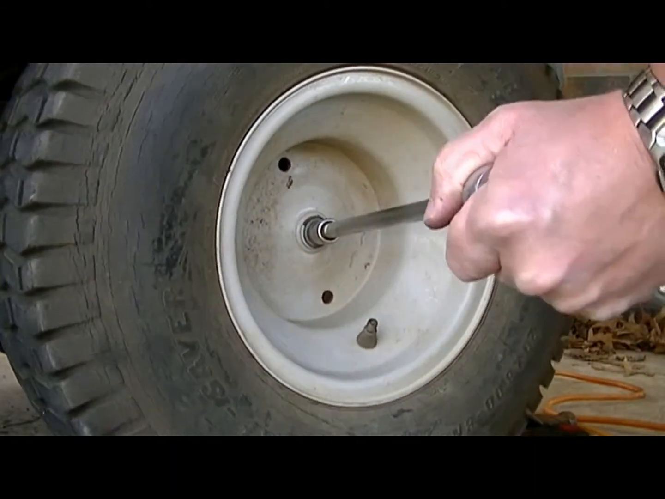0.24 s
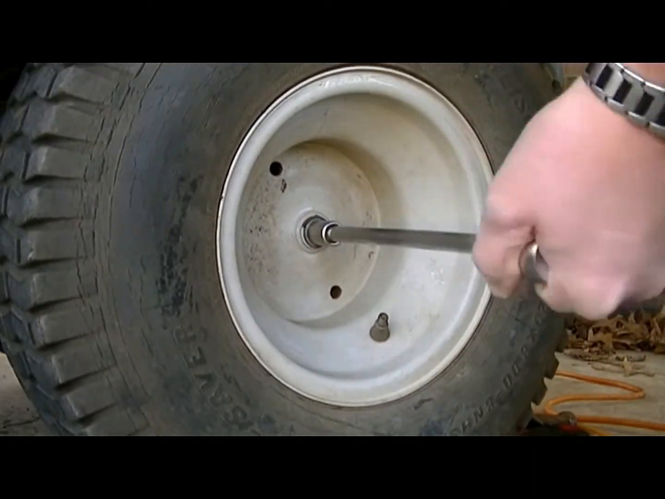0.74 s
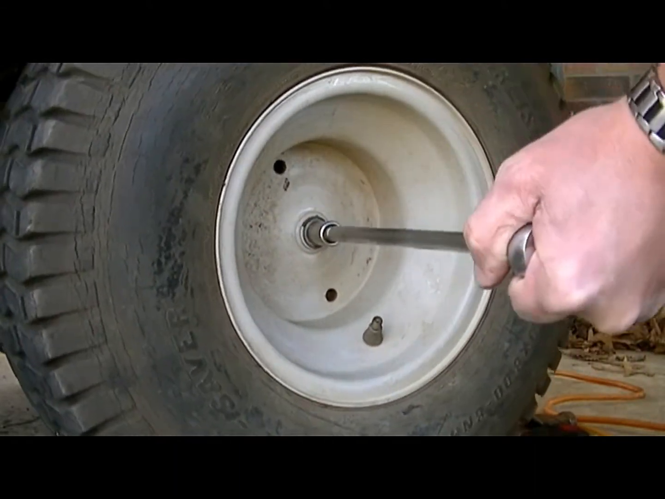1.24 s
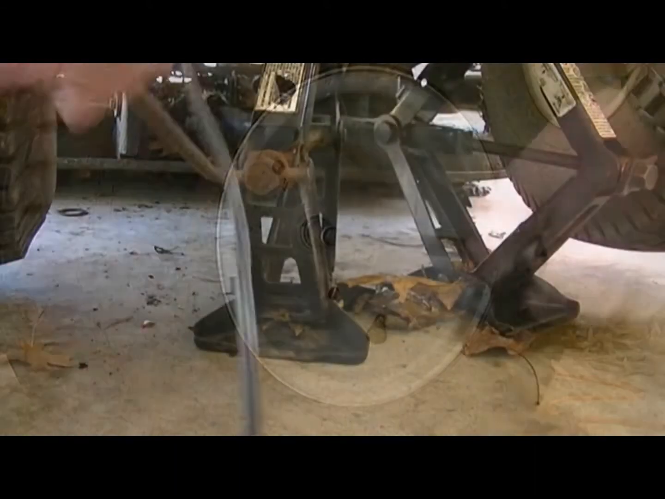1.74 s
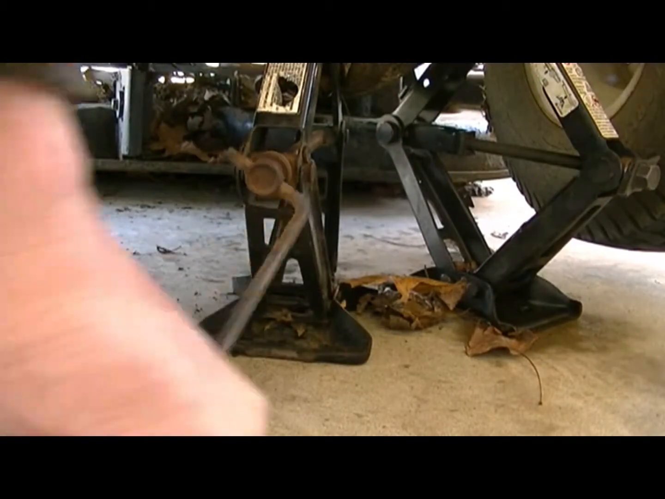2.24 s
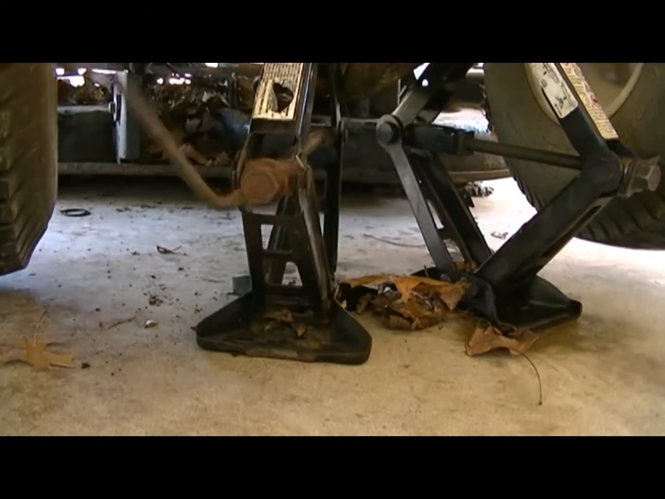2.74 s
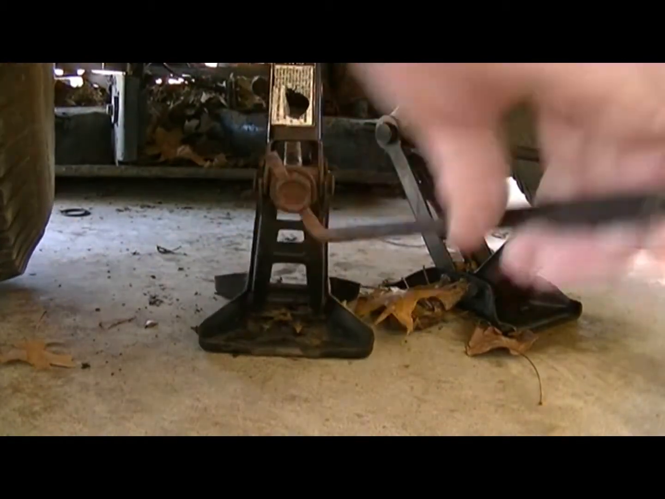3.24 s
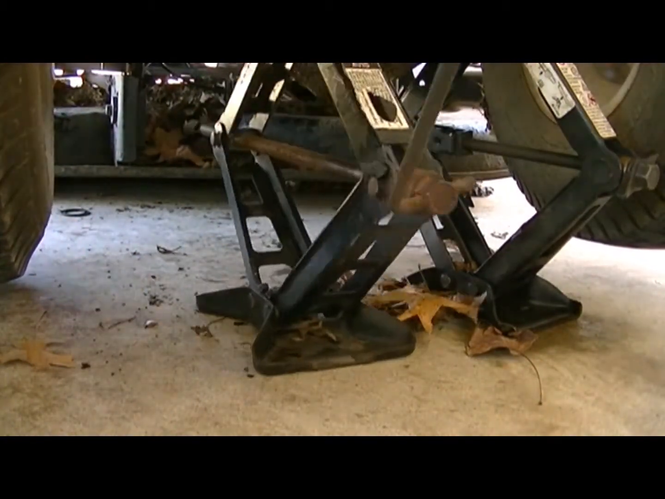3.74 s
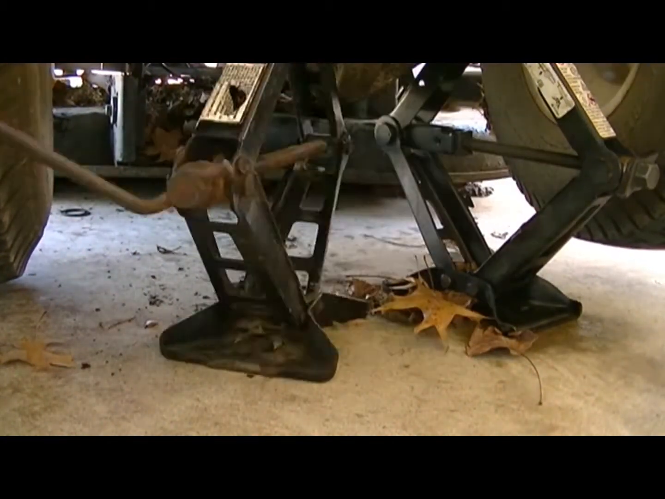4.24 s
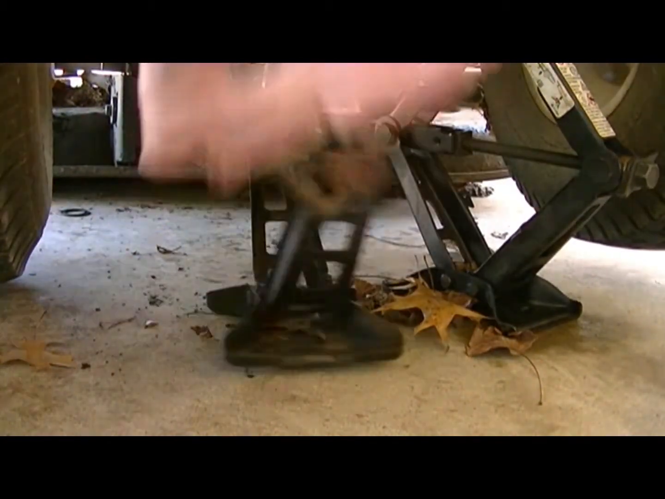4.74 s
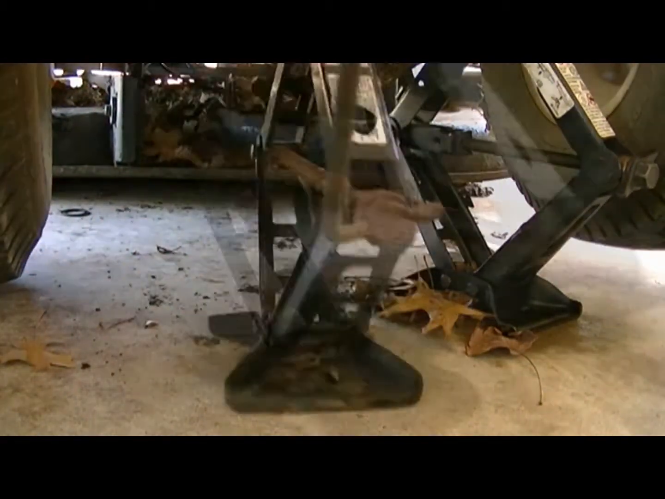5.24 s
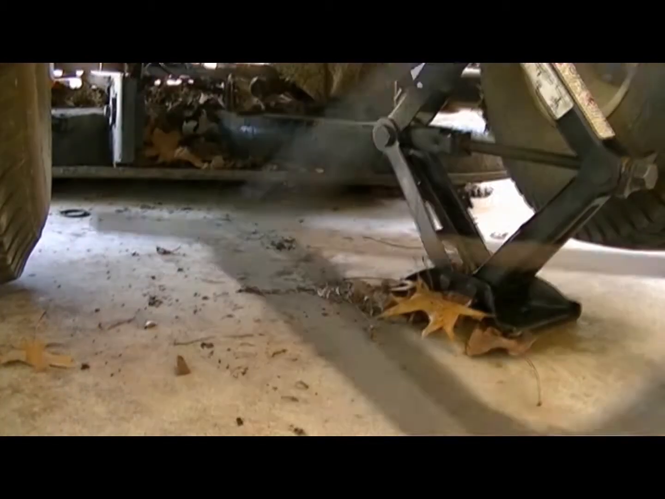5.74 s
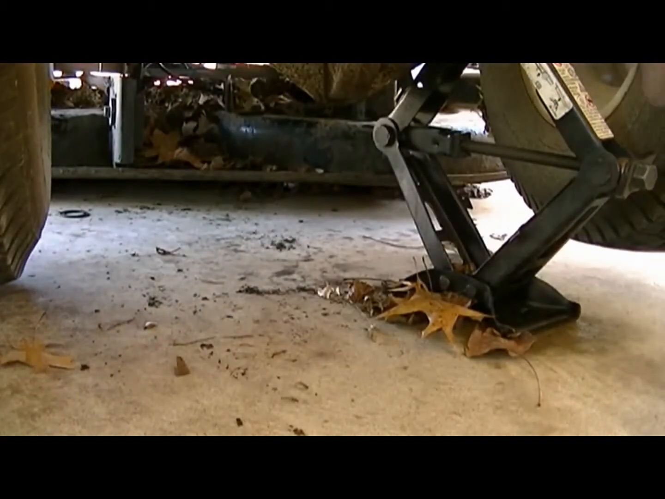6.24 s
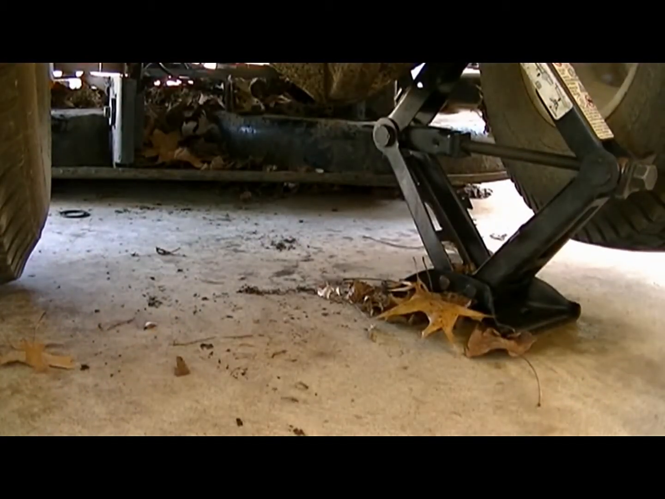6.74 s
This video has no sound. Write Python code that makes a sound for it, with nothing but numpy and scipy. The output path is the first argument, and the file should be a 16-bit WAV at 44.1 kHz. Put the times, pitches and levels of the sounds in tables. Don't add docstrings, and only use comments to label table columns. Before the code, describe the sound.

A close microphone in a garage with a short, dull reverberation; a motor drones low and faint far away throughout. At 0.25-0.4 s a wrench on a tight wheel nut gives a cluster of bright ticks and a creak, then only tiny clicks. A blink of silence falls at 1.6 s, followed by a small squeak and gritty snaps until 1.9. After a lull, a very loud, high, dry screw squeak jumps out at 2.63, then a harsher stuttering run at 2.8-2.95. From 3.45 the loose steel frame wobbles with scratchy rubs, clicks and dull floor knocks, notably at 3.65, 4.16 and, hardest, 4.95; small squeaks mix in. A raspy drag rushes across concrete at 5.65-5.95. At 6.0 the jack falls in a harsh, ringing clatter, bouncing until 6.3, overloading the microphone; light tinkling bounces follow near 6.45, then faint drone and airy bustle.

```python
import sys
import numpy as np
from scipy import signal
from scipy.fft import rfft, irfft
from scipy.io import wavfile

SR = 44100
rng = np.random.default_rng(int(sys.argv[2]) if len(sys.argv) > 2 else 0)


def store_pcm(level_fs):
    pcm = np.round(np.clip(level_fs, -1, 1) * 32767).astype(np.int16)
    wavfile.write(sys.argv[1], SR, np.atleast_2d(pcm).T)


def amplitude_ratio(level_db):
    exponent = np.asarray(level_db, float) / 20
    return 10 ** exponent


N = 308429


def band(x, low_hz, high_hz, order=2):
    return signal.sosfilt(signal.butter(order, [low_hz, high_hz], "band", fs=SR, output="sos"), x)


def rms_one(x):
    return x / np.sqrt(np.mean(x ** 2) + 1e-20)


def at_hz(points, hz):
    curve_hz, curve_db = np.transpose(points)
    return np.interp(np.log(hz), np.log(curve_hz), curve_db)


def drift(rate, size=N):
    step_rate = 2000
    points = rng.standard_normal(int(size / SR * step_rate) + 500)
    r = np.exp(-2 * np.pi * rate / step_rate)
    slow = signal.lfilter([1], [1, -2 * r, r * r], points)[498:]
    slow = slow * 2 * (1 - r) ** 1.5
    return np.interp(np.arange(size) / SR * step_rate, np.arange(len(slow)), slow)


def ring(x, hz, t60):
    r = amplitude_ratio(-60 / (t60 * SR))
    w = 2 * np.pi * hz / SR
    return signal.lfilter([0, np.sin(w)], [1, -2 * r * np.cos(w), r * r], x + 1e-18)


def swell(s, rise_ms, fall_ms, shape):
    first = max(0, int((s - .008 * rise_ms) * SR))
    last = min(N, int((s + .01 * fall_ms) * SR))
    at = np.arange(first, last)
    ms = (at / SR - s) * 1000
    side_ms = np.where(ms < 0, max(rise_ms, .3), max(fall_ms, .3))
    return at, 2.0 ** -np.abs(ms / side_ms) ** shape


def coloured(spectrum):
    hz = np.maximum(np.arange(N // 2 + 1) * SR / N, 1)
    inside = (hz > spectrum[0][0] / 2) & (hz < spectrum[-1][0] * 2)
    return rms_one(irfft(rfft(rng.standard_normal(N)) * amplitude_ratio(at_hz(spectrum, hz)) * inside, N))


# pitch in Hz, level in dB per Hz.
RUMBLE_TONE = [(20, -47.5), (45, -19.5), (65, -11), (90, -4.5), (130, -4.5), (270, -4.5), (750, -10),
               (1300, -13), (2500, -21.5), (5000, -44)]
# pitch in Hz, level in dB per Hz.
HISS_TONE = [(900, 5), (1600, -2.5), (3500, 1.5), (8000, -4), (12000, -12.5), (16000, -19)]
# multiple of the lowest pitch, level in dB.
DRONE_LINES = [(1, 1), (1.497, -11), (2, -12.5), (3, -16.5), (4, -9.5), (5.001, -13), (7.25, -35)]
# time in seconds, level in dB.
BUSTLE_LEVEL = [(0.0, -56), (1.57, -57.5), (1.61, -47.5), (2.05, -54.5), (4.1, -49.5), (6.5, -46),
                (6.99, -46.5)]
# time in seconds, level in dB.
MOTOR_LEVEL = [(0.0, -56), (0.52, -55.5), (1.57, -57), (1.61, -53), (2.05, -46), (2.6, -52), (4.09, -53),
               (5.5, -50), (6.499, -50.5), (6.99, -49)]
# time in seconds, level in dB.
HUM_LEVEL = [(0.0, 2), (0.45, 4), (1.57, 4.5), (2.0, -8), (3.2, 9.5), (3.6, -3.5), (6.3, -6), (6.7, -6)]


def background():
    t = np.arange(N) / SR
    rumble_db, motor_db, hum_db = [np.interp(t, *np.transpose(curve))
                                   for curve in (BUSTLE_LEVEL, MOTOR_LEVEL, HUM_LEVEL)]
    drone_hz = 90.2 * (1 + 0.006 * drift(3))
    phase = 2 * np.pi * np.cumsum(drone_hz) / SR
    multiple, lowest_db = DRONE_LINES[0]
    lowest = amplitude_ratio(lowest_db + drift(25)) * np.sin(multiple * phase)
    throb = 0.23 * rms_one(band(rng.standard_normal(N), 73, 110))
    hum = sum(amplitude_ratio(level_db - 55 + drift(1.7)) * np.sin(k * phase) for k, level_db in DRONE_LINES[1:])
    rumble = amplitude_ratio(rumble_db + 1.2 * drift(6)) * coloured(RUMBLE_TONE)
    hiss_db = -63.5 + 0.38 * (rumble_db + 50.5)
    hiss = amplitude_ratio(hiss_db + 1.4 * drift(9)) * coloured(HISS_TONE)
    return rumble + hiss + amplitude_ratio(motor_db + 1) * (lowest + throb) + amplitude_ratio(hum_db) * hum


def blows(table, cycles, linger, crack_db, crack_per_ring, low_hz, high_hz, boom_db):
    out, t = np.zeros(N + SR), np.arange(SR // 4) / SR
    for s, peak_db, hz in table:
        t60 = (cycles - linger * peak_db) / hz
        puff = rng.standard_normal(len(t)) * amplitude_ratio(crack_db - 60 * t / (crack_per_ring * t60))
        puff = band(puff, low_hz, high_hz)
        tone = np.sin(2 * np.pi * hz * t) * amplitude_ratio(-60 * t / t60)
        tone += np.sin(2 * np.pi * 0.81 * hz * t) * amplitude_ratio(boom_db - 28 * t / t60)
        start = int(s * SR)
        out[start:start + len(t)] += amplitude_ratio(peak_db) * (tone * np.minimum(t * hz, 1) + puff)
    return out[:N]


def sharp_blows(table, cycles):
    return 0.49 * blows(table, cycles, 0, crack_db=-2.5, crack_per_ring=1.0, low_hz=2234, high_hz=6840, boom_db=-38)


# start in seconds, peak level in dB, ring pitch in Hz.
PLAY_TICKS = [(0.2403, -26.5, 2630), (0.3226, -19, 4140), (0.3443, -12.5, 5100), (0.3606, -24, 4000),
              (0.5312, -40, 3040), (0.7512, -36.5, 2310), (0.8515, -44, 2210), (1.366, -33, 2600),
              (1.392, -39, 2520), (1.4577, -37.5, 2700), (1.5494, -33, 2620), (1.7085, -25, 4700),
              (1.709, -26, 2000), (3.7411, -7.5, 5600), (3.7978, -28, 2530), (3.8205, -17, 2420),
              (4.3464, -27, 2430), (4.4882, -25, 2240), (4.574, -29.5, 2480), (5.1821, -18.5, 2160),
              (5.215, -15.5, 2480), (5.622, -17, 7480)]


def play_ticks():
    return sharp_blows(PLAY_TICKS, cycles=35)


# start in seconds, peak level in dB, pitch in Hz.
FLOOR_KNOCKS = [(0.287, -21, 377), (0.302, -22.5, 510), (0.344, -21.5, 396), (0.363, -28, 377),
                (0.455, -36, 370), (0.671, -31, 404), (0.748, -30, 353), (1.64, -32, 332),
                (1.683, -28, 580), (2.067, -34, 600), (3.015, -25, 196), (3.016, -20.5, 411),
                (3.645, -12.5, 310), (3.667, -29, 228), (4.157, -12, 316), (4.199, -27, 370),
                (4.224, -23.5, 220), (4.401, -40, 245), (4.518, -26, 255), (4.53, -37, 576),
                (4.713, -19, 332), (4.739, -21.5, 306), (4.9505, -17, 370), (4.952, -5, 297),
                (4.978, -19, 224), (5.524, -13, 317), (5.558, -33, 241), (3.055, -34, 378),
                (5.777, -13.5, 508), (5.779, -38, 254)]


def floor_knocks():
    return 0.51 * blows(FLOOR_KNOCKS, cycles=9.9, linger=0.35, crack_db=4, crack_per_ring=1.18,
                        low_hz=186, high_hz=1380, boom_db=-10.5)


# start in seconds, peak level in dB, ring pitch in Hz.
GRIT_SNAPS = [(0.2885, -33, 4300), (0.3225, -15, 6000), (0.3363, -13.5, 8500), (0.337, -15, 2750),
              (1.7908, -30, 7000), (1.8318, -11.5, 7600), (1.84, -25, 9000), (1.848, -18, 2300),
              (1.8715, -46, 8490), (3.763, -27, 2700), (4.6164, -26.5, 2880), (4.6798, -23.5, 3480),
              (5.5657, -28, 5520)]


def grit_snaps():
    return sharp_blows(GRIT_SNAPS, cycles=15)


def steel(force, treble, body, modes, per_s, spread_db, ring_db, dense_db):
    caught = rng.random((3, N)) < per_s / SR
    strength = amplitude_ratio(spread_db * np.minimum(rng.exponential(1, (3, N)), 5))
    catches = rms_one(caught * strength * rng.choice([-1, 1], (3, N)))
    middle, high, low = catches * [force, treble, body]
    out = 2.28 * band(middle, 1590, 4840) + 1.34 * band(high, 4500, 9040) + 0.98 * band(low, 490, 1474)
    direct = out * amplitude_ratio(dense_db)
    t = np.arange(2000) / SR
    for thicket in rng.standard_normal((5, len(t))) * amplitude_ratio(-60 * t / 0.0078):
        thicket = thicket / np.linalg.norm(thicket)
        out += signal.oaconvolve(direct * .25 * drift(14), thicket)[:N]
    for k, (hz, width, level_db) in enumerate(modes):
        push = treble if hz > 4500 else force
        mode_db = ring_db + level_db + 4 * drift(12)
        drive = np.roll(catches[2], 999 * (k + 1)) * push * amplitude_ratio(mode_db)
        out += (-1) ** k * ring(drive, hz, 2.2 / width) * np.sqrt(width / SR)
    return out


# pitch in Hz, width in Hz, level in dB.
STANDING_MODES = [(2320, 100, 2), (2480, 215, 6), (2000, 650, -12.5), (4040, 80, -20), (5020, 230, -8),
                  (5400, 41, -3.5), (5180, 360, 4.5), (8000, 45, -4), (8640, 42, -2.5)]
# peak time in seconds, level in dB, length in ms, treble in dB.
CREAK_RUBS = [(0.333, -35.5, 23, -6), (0.364, -55, 44, 3), (0.5, -60.5, 43, 3), (1.645, -36.5, 18, -40),
              (1.687, -34.5, 10, -30), (1.709, -44, 2.1, -32), (1.792, -45, 4.1, -14), (1.824, -42, 13, 5),
              (1.852, -31.5, 4.8, -23), (1.97, -58.5, 72, 3), (2.305, -58, 15, -9), (2.39, -61, 25, 5),
              (2.5, -52.5, 12, 0), (2.6, -55.5, 640, -1), (2.85, -28, 12, -1.5), (2.9, -29, 16, -16),
              (2.968, -45, 21, -9), (3.02, -44, 11, -9), (3.132, -49, 11, -6), (3.178, -43, 28, -0.5),
              (3.372, -54, 24, 3)]
# peak time in seconds, level in dB, length in ms, treble in dB.
WOBBLE_RUBS = [(3.458, -54.5, 22, 4), (3.512, -34, 27, -14), (3.542, -33, 20.5, -6),
               (3.618, -41.5, 24, -20), (3.647, -25, 13.5, -27), (3.729, -44.5, 17, -1),
               (3.745, -32.5, 4.5, 4.5), (3.765, -47, 6.2, -17), (3.836, -38, 33, -11), (3.9, -41, 14, 6.5),
               (3.951, -39.5, 18, -14), (3.976, -36.5, 12.4, 6), (4.002, -35, 23, 2),
               (4.066, -38, 9.3, -40), (4.103, -47, 16, -2), (4.138, -32.5, 28, -2), (4.159, -32, 21, -7),
               (4.199, -28.5, 20, -1), (4.225, -34, 9.9, -23), (4.36, -55, 8.6, -18), (4.417, -38, 23, -37),
               (4.475, -45, 5.4, 0), (4.491, -41, 4.7, 0), (4.525, -44, 17, -6), (4.621, -49.5, 35, -25)]
# peak time in seconds, level in dB, length in ms, treble in dB.
CATCH_RUBS = [
    (3.481, -39.5, 15, -1),
    (3.498, -37, 11, -1),
    (3.606, -50, 14, -7),
    (3.798, -44, 8, -6),
    (3.822, -33.5, 11, -4),
    (4.097, -47, 8, 1),
    (5.214, -37.5, 9.3, -1),
    (5.867, -38, 15.5, -9),
]
# peak time in seconds, level in dB, length in ms, treble in dB.
SHUFFLE_RUBS = [(4.679, -39.5, 19, -23), (4.71, -25.5, 16.4, -10), (4.742, -29.5, 3.8, -28),
                (4.822, -35.5, 14, 5.5), (4.915, -61, 11, -13), (4.945, -32.5, 11, -33),
                (4.954, -19.5, 9.9, -10), (4.98, -38, 63, -11), (5.067, -33.5, 20, -40),
                (5.122, -36, 17, -1), (5.185, -38, 24, -6), (5.226, -37, 18, 3), (5.258, -36.5, 38, -40),
                (5.329, -32, 15, -9), (5.362, -33, 10.6, -26), (5.384, -40.5, 10, -8), (5.416, -49, 11, -9),
                (5.474, -36, 18.4, -1.5), (5.523, -27.5, 7, -9.5), (5.568, -59, 7.2, 6),
                (5.625, -35, 17.3, 3)]
# time in seconds, pressure in dB.
DRAG_PRESSURE = [
    (5.64, -44),
    (5.667, -33),
    (5.681, -25.5),
    (5.758, -25),
    (5.815, -22.5),
    (5.855, -32),
    (5.872, -30.5),
    (5.924, -35),
    (5.985, -59.5),
]
# peak time in seconds, level in dB, length in ms, treble in dB.
DRAG_JOLTS = [
    (5.666, -28, 5, -12),
    (5.69, -20.5, 17, -6.5),
    (5.72, -16, 13, -8.5),
    (5.742, -19, 12, -8),
    (5.764, -17.5, 16, 1.5),
    (5.784, -14, 7, 3),
    (5.803, -17.5, 11, 1.5),
    (5.813, -23, 8, -10),
    (5.9, -36.5, 11, -9),
    (5.923, -41.5, 5.4, -5),
]


def rubs():
    force, t = np.zeros((3, N)), np.arange(N) / SR
    # its table, low ring of its parts (dB), share of the length before the peak
    for table, body_db, rise in ((CREAK_RUBS, -4, 0.44), (WOBBLE_RUBS, -0.5, 0.44), (SHUFFLE_RUBS, 1.5, 0.44),
                                 (DRAG_JOLTS, -2.5, 0.44), (CATCH_RUBS, -2.5, 0.16)):
        for s, level_db, length_ms, treble_db in table:
            at, gain = swell(s, rise * length_ms, (1 - rise) * length_ms, shape=1.3)
            fullness_db = body_db - 0.8 * (level_db + 32.5)
            force[:, at] += gain * amplitude_ratio(level_db + np.array([[0], [treble_db], [fullness_db]]))

    s, pressure_db = np.transpose(DRAG_PRESSURE)
    drag_db = np.interp(t, s, pressure_db, left=-120, right=-120)
    treble_db = 1 + 2.5 * (drag_db - pressure_db.max())
    body_db = -6.5 + 27.5 * np.clip(t - s[0], 0, s[-1] - s[0])
    force += amplitude_ratio(drag_db + 3.5 + np.array([0 * t, treble_db, body_db]))

    flutter_db = np.where(t < s[0], 1.6, 0.84) * drift(90)
    ring_db = np.select([t < WOBBLE_RUBS[0][0] - .05, t < s[0]], [-10.5, -1.5], -14)
    return 0.63 * steel(*force * amplitude_ratio(flutter_db), STANDING_MODES, per_s=19000, spread_db=2.1,
                        ring_db=ring_db, dense_db=3)


# peak time in seconds, pitch in Hz, level in dB, length in ms, width in Hz.
GLINT_TONES = [(3.511, 2230, -37, 25, 300), (3.541, 5600, -48, 19, 300), (3.615, 5470, -56, 18, 250),
               (3.648, 2190, -29.5, 12.2, 300), (3.83, 2410, -38, 18, 200), (4.0, 1740, -40, 16, 100),
               (4.157, 2700, -41, 9.2, 400), (4.2, 4900, -30, 12, 250), (4.2, 2460, -28.5, 14, 150),
               (4.35, 4580, -46, 15, 150), (4.372, 4570, -48, 9.8, 100), (4.416, 5350, -50, 24, 200),
               (4.435, 2620, -43.5, 20, 400), (4.497, 8650, -51, 12, 80), (4.525, 1240, -36, 16.3, 500),
               (4.595, 5300, -56, 12, 200), (4.713, 5820, -38, 13, 120), (4.711, 8300, -33.5, 15.6, 400),
               (4.955, 2200, -26, 6, 500), (5.064, 2530, -31, 22, 250), (5.07, 5250, -34, 14, 300),
               (5.06, 4100, -42, 23, 120), (5.126, 2630, -37.5, 18, 250), (5.123, 4840, -36, 11, 400),
               (5.224, 5100, -31.5, 22, 400), (5.235, 2580, -30, 28, 200), (5.259, 4260, -40, 18, 300),
               (5.327, 4670, -32.5, 16.7, 400), (5.328, 6700, -36.5, 16.6, 300),
               (5.385, 4930, -42, 16, 150), (5.475, 6100, -43, 16, 150), (5.719, 2280, -33, 31.4, 400),
               (5.762, 7950, -22, 13, 250), (5.789, 2940, -21, 33, 150), (5.812, 1600, -22.5, 17, 396),
               (5.88, 6500, -42, 30, 202), (1.683, 5670, -34.5, 12.4, 200), (1.853, 2360, -41, 9.5, 300),
               (1.853, 606, -40, 8, 300), (2.939, 2700, -51, 30, 60), (3.898, 6810, -33.5, 15, 60),
               (4.13, 8950, -41, 14, 150), (3.902, 8200, -48, 18, 80)]


def glints():
    out = np.zeros(N)
    for s, hz, level_db, length_ms, width in GLINT_TONES:
        at, gain = swell(s, 0.44 * length_ms, 0.56 * length_ms, shape=1.46)
        tone = ring(rng.standard_normal(len(at)), hz, 2.2 / width)
        out[at] += amplitude_ratio(level_db) * gain * rms_one(tone)
    return out


# peak time in seconds, pitch in Hz, level in dB,
# length in ms, overtone loss in dB at the first octave.
SCREW_SQUEAKS = [(1.732, 1606, -20.5, 19, 15.5), (2.631, 1848, -2, 19, 25), (2.62, 3580, -21, 10.2, 14),
                 (2.665, 1840, -30, 20, 27), (2.714, 1845, -23, 11.4, 40), (2.819, 2092, -18.5, 17.4, 55),
                 (2.846, 1910, -14.5, 15, 13.5), (2.866, 1980, -18.5, 13.5, 27), (2.882, 1890, -26, 12, 29),
                 (2.956, 1916, -32, 60, 33), (2.903, 1739, -10.5, 22, 5.5), (2.856, 3850, -25, 15, 43),
                 (2.917, 2540, -22.5, 18, 20), (3.897, 1369, -25.5, 17.6, 5), (3.91, 1369, -26, 20, 9.5),
                 (4.065, 1330, -33.5, 17, 8), (4.368, 2320, -29, 11, 13), (4.6, 2440, -38.5, 16, 23),
                 (4.822, 2413, -25.5, 14.4, 30), (5.361, 2360, -22.5, 18, 24), (4.204, 8640, -19.5, 25, 38),
                 (5.515, 1354, -27.5, 12, 32)]
# pitch in Hz, level in dB.
SQUEAK_TONE = [(1000, -14), (5600, -2.5), (7000, -15), (9000, -21), (11000, -34.5), (16000, -32.5)]


def squeaks():
    out = np.zeros(N)
    for s, hz, level_db, length_ms, loss_db in SCREW_SQUEAKS:
        at, gain = swell(s, 0.45 * length_ms, 0.55 * length_ms, shape=1.78)
        sag = .055 * max(0, 3 - loss_db / 8) * (1 - gain) ** 2 * (at > s * SR)
        wander = (0.001 + 0.0043 * amplitude_ratio(level_db / 1.7)) * drift(120, size=len(at))
        phase = 2 * np.pi * np.cumsum(hz * (1 - sag + wander)) / SR
        softness = .45 - level_db / 35
        roughness_db = .3 + .55 * amplitude_ratio(level_db / 2) + 2.5 / loss_db
        for k in np.arange(.5, 9.5, .5):
            flutter_db = roughness_db * (1 + np.log2(1 + k)) * drift(220, size=len(at))
            if k == 1:
                flutter_db = .3 * flutter_db
            if k % 1:
                part_db = -26 + 0.72 * level_db - 2.2 * k
            else:
                part_db = -loss_db * np.log2(k) ** 0.41
            part_db += level_db + at_hz(SQUEAK_TONE, k * hz) * softness + flutter_db
            if k * hz < 17000:
                out[at] += gain ** (1 + .03 * k) * amplitude_ratio(part_db) * np.sin(k * phase + k * k)
    return out * np.sqrt(2) - 0.28 * out ** 2


# peak time in seconds, level in dB, rise in ms, fall in ms.
BASE_ROCKS = [
    (3.649, -29.5, 6.8, 9.4),
    (3.749, -42, 14, 7.5),
    (4.16, -37, 2.7, 10.5),
    (4.2, -38.5, 9.8, 12),
    (4.53, -45, 7.2, 12),
    (4.746, -34.5, 4, 8.6),
    (4.953, -24, 6.7, 9.1),
    (5.525, -29.5, 2.4, 3.9),
    (5.08, -48.5, 40, 110),
]
THUMP_HZ = (184, 594)


def rocks():
    force = np.zeros(N)
    for s, level_db, rise_ms, fall_ms in BASE_ROCKS:
        at, gain = swell(s, rise_ms, fall_ms, shape=1.14)
        force[at] += amplitude_ratio(level_db) * gain
    return force * rms_one(band(rng.standard_normal(N), *THUMP_HZ))


# start in seconds, blow in dB, time to fade by 60 dB in ms, treble in dB, body in dB.
FALL_BLOWS = [(6.0113, -3, 55, -3.5, -6), (6.029, -26, 130, -11, -1), (6.074, -33.5, 82, -9.5, -1),
              (6.0934, -7.5, 150, 5.5, 2.5), (6.123, -7.5, 182, -2, -2.5), (6.2008, -2, 97, -1, -5.5),
              (6.213, -13, 76, -7, -3), (6.25, -23, 25, -8, -19), (6.2708, -16, 76, -9.5, 0.5),
              (6.3126, -18.5, 80, 11, -4.5), (6.4321, -35.5, 73, 4, 11.5), (6.437, -34.5, 66, 4, 1),
              (6.458, -50, 22, -7, -21), (6.4871, -40, 69, 5, 9)]
# pitch in Hz, width in Hz, level in dB.
FALLEN_MODES = [(970, 87, -6), (1800, 90, -18.5), (2500, 60, -6.5), (3300, 80, -17), (3450, 600, 3),
                (4680, 120, -8.5), (5350, 80, -4.5), (6700, 100, -11), (7950, 30, -7.5), (9800, 36, -9.5),
                (11700, 40, -23.5), (10700, 39.9, -21)]


def falls():
    force, t = np.zeros((3, N + SR)), np.arange(SR // 2) / SR
    for s, blow_db, t60_ms, treble_db, body_db in FALL_BLOWS:
        dying = amplitude_ratio(-60000 * t / t60_ms) * np.minimum(t / 0.00035, 1)
        dying += amplitude_ratio(-22 - 184 * t)
        start = int(s * SR)
        force[:, start:start + len(t)] += dying * amplitude_ratio(blow_db + np.array([[0], [treble_db], [body_db]]))
    ring_db = np.where(np.arange(N) < 6.3 * SR, -5.5, 0.5)
    return steel(*force[:, :N], FALLEN_MODES, per_s=16000, spread_db=1, ring_db=ring_db, dense_db=-16)


# start in seconds, pitch in Hz, peak level in dB, time to fade by 60 dB in ms.
FALL_CHIMES = [(6.012, 2500, -9.5, 67), (6.012, 3663, -5, 48), (6.012, 950, -24, 140),
               (6.012, 3110, -16, 75), (6.012, 7920, -23.5, 120), (6.094, 3724, -9, 160),
               (6.094, 3977, -8, 120), (6.094, 6450, -15, 130), (6.094, 7920, -23, 90),
               (6.094, 2762, -12, 90), (6.124, 1774, -16, 160), (6.124, 3960, -15, 110),
               (6.124, 3170, -18, 100), (6.124, 5245, -13, 110), (6.124, 6420, -13.5, 150),
               (6.201, 2583, -11.5, 170), (6.201, 3670, -11, 100), (6.201, 3396, -10, 81),
               (6.201, 6060, -9.5, 100), (6.201, 7960, -20.5, 160), (6.317, 4684, -14.5, 81),
               (6.313, 6700, -20, 94), (6.313, 7990, -24, 110), (6.313, 11750, -24, 120),
               (6.313, 13800, -39, 90), (6.313, 2750, -22, 150), (6.313, 9790, -32, 120),
               (6.313, 11150, -25.5, 95), (6.4375, 4680, -17.5, 33), (6.434, 6700, -23, 62),
               (6.4375, 7950, -37.5, 240), (6.4356, 8300, -28.5, 54), (6.4356, 9800, -34, 74),
               (6.4375, 11700, -43, 140), (6.4873, 4680, -44, 87), (6.4873, 6540, -35, 74)]


def chimes():
    out, t = np.zeros(N + SR), np.arange(SR // 2) / SR
    for s, hz, peak_db, t60_ms in FALL_CHIMES:
        detune, angle = rng.uniform(.004, .012), rng.uniform(0, 2 * np.pi)
        pair = np.sin(2 * np.pi * hz * t)
        pair += .4 * np.sin(2 * np.pi * hz * (1 + detune) * t + angle)
        start = int(s * SR)
        out[start:start + len(t)] += amplitude_ratio(peak_db - 60000 * t / t60_ms) * np.minimum(t / .001, 1) * pair
    return out[:N]


def garage(x):
    t = np.arange(SR // 2) / SR
    tail = band(rng.standard_normal(len(t)), 300, 6200, order=1)
    tail = tail * amplitude_ratio(-60 * t / 0.094) * (t > .004)
    return signal.fftconvolve(x, amplitude_ratio(-20) * tail / np.linalg.norm(tail))[:N]


SILENCE_S = (1.578, 1.604)


def scene():
    near = play_ticks() + floor_knocks() + grit_snaps() + rubs() + glints() + squeaks()
    near += rocks() + falls() + chimes()
    t = np.arange(N) / SR
    fade_out = (SILENCE_S[0] - t) / 0.0017
    fade_in = (t - SILENCE_S[1]) / 0.019
    running = np.clip(np.maximum(fade_out, fade_in), 0, 1)
    return ((near + garage(near) + background()) * running)[None]


def roll_off(x):
    return signal.sosfilt(signal.butter(12, 16800, fs=SR, output="sos"), x)


def record(dry):
    overload = .6
    top = signal.cheby2(10, 30, 16100, fs=SR, output="sos")
    dull = signal.sosfilt(top, dry)
    flat = dull / (1 + np.abs(dull / overload) ** 10) ** (1 / 10)
    mix = band(signal.sosfilt(top, flat), 36, 19000)
    return roll_off(mix)


dry = scene()
out = record(dry)
store_pcm(out)
```